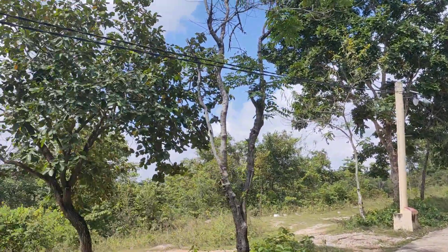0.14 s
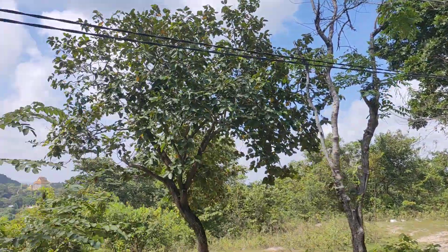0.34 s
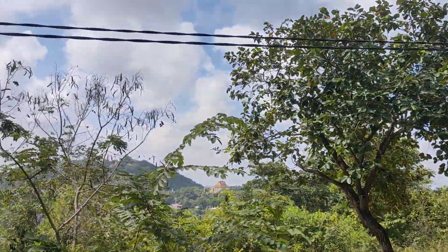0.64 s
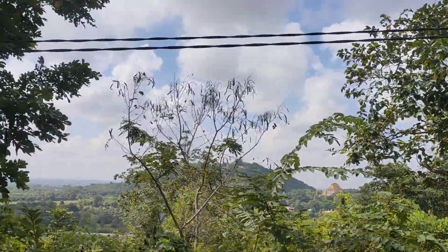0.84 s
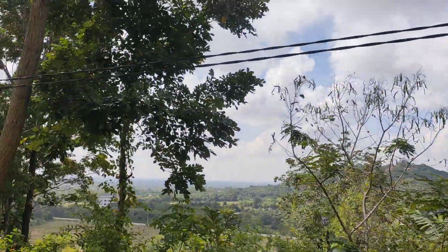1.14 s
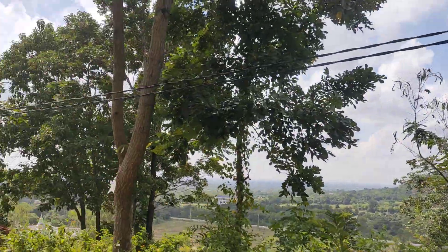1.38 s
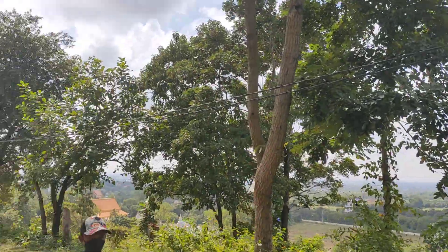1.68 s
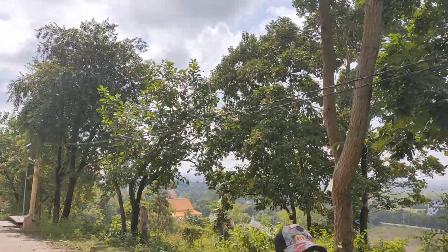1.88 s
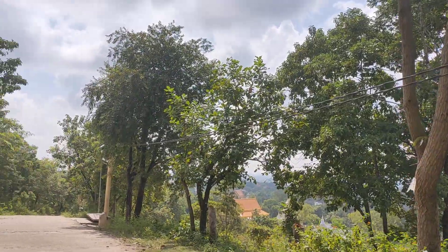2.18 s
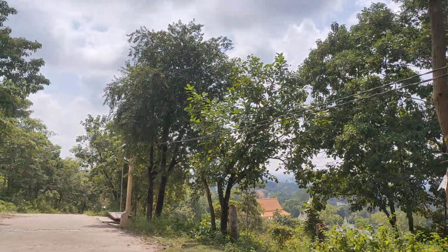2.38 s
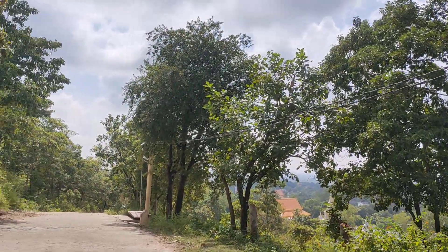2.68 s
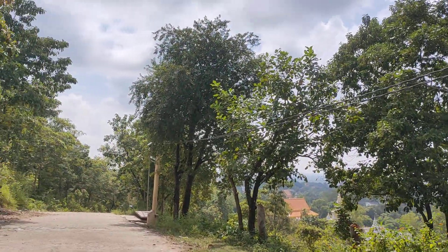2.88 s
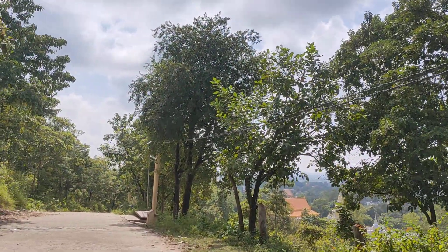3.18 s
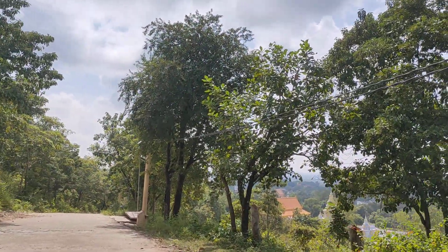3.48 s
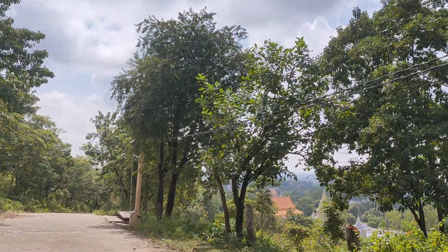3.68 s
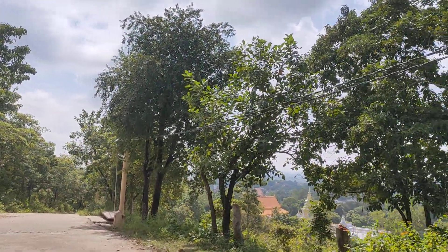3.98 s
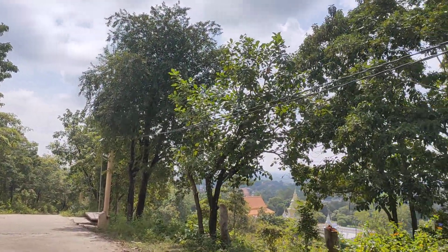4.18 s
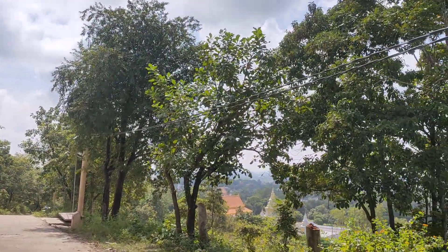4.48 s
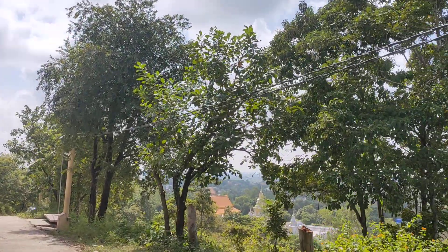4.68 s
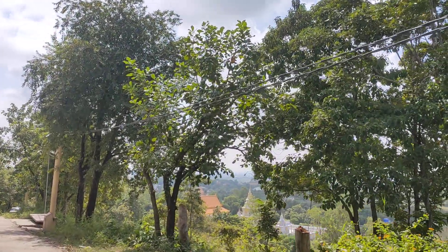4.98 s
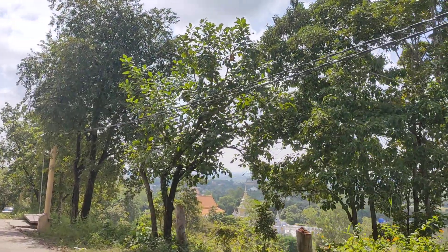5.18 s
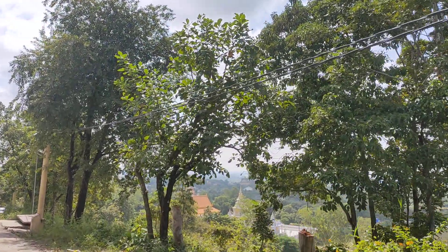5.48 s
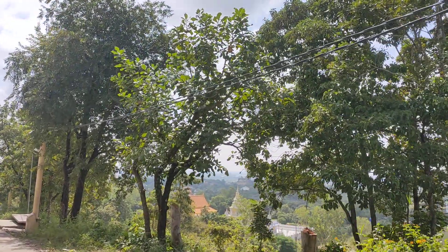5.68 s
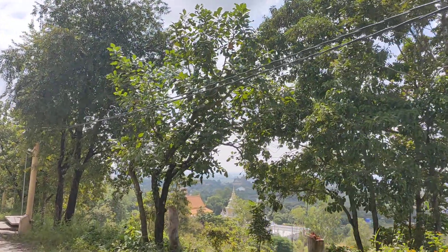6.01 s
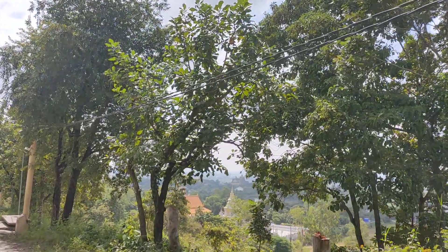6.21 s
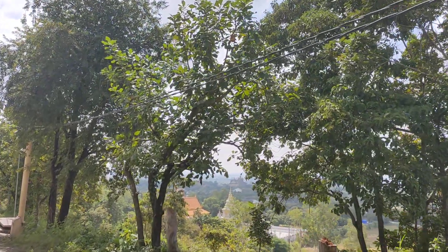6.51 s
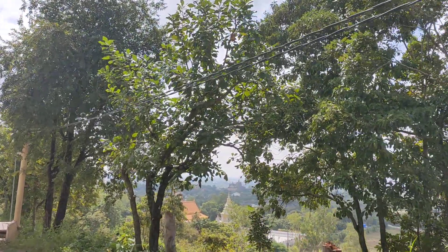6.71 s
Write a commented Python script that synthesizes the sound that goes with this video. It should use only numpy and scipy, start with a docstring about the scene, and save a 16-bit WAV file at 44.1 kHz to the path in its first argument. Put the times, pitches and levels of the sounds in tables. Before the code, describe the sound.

A single-cylinder motorbike putters at idle up a wooded hill road, over a faint low rumble of outdoor air. At about 0.3 seconds something hollow clacks once, with a few ticks of grit around it. Soft low thumps, mostly a strong one followed by a weaker one, recur from the start until about 5 seconds. The bike grows louder and passes very close to the hand-held phone between 2 and 2.5 seconds, with a swell of tyre roar, a bright sizzle sinking in pitch, and a cracking, raspy exhaust. Just after 3 seconds the throttle opens a little and the putter turns slightly faster and tighter, with a chain rasp, more grit and one thin, brief squeak. Valves tick faintly around 4 seconds. Engine and tyre noise fade gradually as the bike leaves, the throttle easing after about 6.3 seconds.

```python
"""The putter of an idling single-cylinder motorbike comes up a wooded hill road, over faint outdoor air.
Grit ticks, soft thumps come mostly in strong-weak pairs, and something hollow clacks once.
Each firing rings the silencer while clatter rings the casing; tyres roar and the running gear hisses.
The bike rolls close past a hand-held phone with a sizzle, a crack and a rasp, then opens the throttle
a little. There is one thin squeak, and the valves tick as it leaves."""
import sys
import numpy as np
from scipy import signal
from scipy.fft import rfft, irfft
from scipy.io import wavfile
from scipy.ndimage import map_coordinates

SR = 44100
rng = np.random.default_rng(int(sys.argv[2]) if len(sys.argv) > 2 else 0)


def generate_wav(sig):
    """Save sig (samples, or channels by samples) to the path in sys.argv[1] as 16-bit PCM at SR."""
    pcm = np.round(np.clip(np.atleast_2d(sig).T, -1, 1) * 32767).astype(np.int16)
    wavfile.write(sys.argv[1], SR, pcm)


N = 302085
TIME = np.arange(N) / SR
FREQ = np.maximum(np.fft.rfftfreq(N, 1 / SR), 1)
PASS_S, SPEED_M_S, CLOSEST_M = 2.261, 4.43, 1.082
THROTTLE_OPENS_S, THROTTLE_CLOSES_S, THROTTLE_MOVE_S = 3.05, 6.32, 0.32

# Table levels are relative: each layer sets its own gain.
# firing rate, sagging at idle until the throttle opens: t/s, f/Hz
FIRING_RATE = [(0, 22.68), (.6, 22.47), (1.2, 22.44), (1.28, 21.77), (1.9, 21.29), (2.4, 20.81),
               (2.9, 20.24), (3.33, 20.66), (3.57, 23.73), (3.85, 23.71), (4.18, 23.92), (4.7, 23.7),
               (5.3, 23.45), (5.88, 24.8), (6.3, 23.6)]
# silencer chamber resonances: f/Hz, width/Hz, level/dB, polarity
SILENCER_MODES = [(125.5, 101.6, 2, 1), (59, 33, -1.5, 1), (80.4, 245, -7.5, -1)]
# how much of each pulse's edge reaches the phone as the pipe turns past: t/s, level/dB
PULSE_EDGE = [(1.3, 10.5), (2.15, 8.5), (2.55, -21), (3.7, 6), (4.8, 7.5), (6.85, 3.5)]
# bearing of the bike from the turning phone, as the left microphone port's lag: t/s, lag/ms
BEARING_LAG = [(1.2, -0.43), (1.9, 0.064), (2.4, 0.48), (3.0, 0.165), (4.7, 0.18)]
# tyre roar spectrum: f/Hz, level/dB
ROAR_EQ = [(30, -16), (90, 9), (200, 0), (380, -1.5), (620, -4), (1100, -8.5), (1600, -11.5), (2200, -17),
           (2800, -17), (4500, -20.5), (7000, -101)]
# running-gear hiss spectrum at the left port: f/Hz, level/dB
HISS_LEFT_EQ = [(2000, -5.5), (4500, -6.5), (6000, -1), (7300, -2), (8500, 5.5), (9800, 0.5), (11500, -6),
                (15000, -14)]
# the same hiss at the right port: f/Hz, level/dB
HISS_RIGHT_EQ = [(2000, -2.5), (4500, -6.5), (5700, -0.5), (7600, 1), (8500, 3), (9800, -4.5),
                 (11500, -16.5), (15000, -15)]
# thin spray on top of the hiss: f/Hz, level/dB
SPRAY_EQ = [(8000, -31), (10500, -9.5), (12500, -5), (14500, -2), (16000, 1)]
# outdoor air spectrum: f/Hz, level/dB
AIR_EQ = [(20, -41), (32, -24), (41, -7), (55, 9.5), (100, -12.5), (170, 0), (235, -9), (300, -18.5),
          (450, -33), (600, -14.5), (1000, -21.5), (1400, -77), (8000, -62)]
# low buffets of air on the phone: t/s, level/dB, half length/s
AIR_BUFFETS = [(0.02, -40.5, 0.045), (2.126, -45, 0.21), (3.166, -38, 0.067), (5.143, -41, 0.11),
               (6.147, -40, 0.069), (6.814, -40, 0.076)]
# engine casing and silencer shell resonances: f/Hz, width before broadening/Hz, level/dB
CASING_MODES = [(282.7, 20, 5), (822, 55, 6.5), (1041, 57, 3.5), (1263, 134, -4), (2590, 310, -9),
                (3440, 160, -11), (5720, 140, -17), (6940, 270, -14)]
# fader ride on the casing's buzz: t/s, level/dB
CASING_LEVEL = [(.7, -60.5), (1.3, -51), (2.0, -48), (3.0, -51), (6.85, -52.5)]
# grit ticking on the road: t/s, level/dB, f/Hz, width/Hz, decay/s, rise/s
GRIT_TICKS = [(0.128, -50, 1800, 2410, 0.05, .003), (.186, -37.5, 556, 595, 0.029, 0.003),
              (0.21, -41, 2980, 1200, 0.016, .005), (0.668, -44, 8400, 6300, 0.0086, .004),
              (3.159, -38, 5300, 3000, 0.014, .002), (3.174, -39, 2380, 1600, 0.0054, .001),
              (3.196, -32, 1430, 1100, 0.0038, 0.00022), (5.757, -42.5, 1750, 1500, 0.02, 0.0057),
              (6.35, -48, 2250, 1600, .014, 0.0053)]
# soft thumps, mostly a strong one then a weaker one: t/s, level/dB
THUMP_HITS = [(0.141, -31), (0.3, -33), (0.487, -30.5), (0.645, -37), (0.836, -30), (0.985, -37),
              (1.175, -30), (1.349, -39.5), (1.548, -32), (1.691, -35.5), (2.05, -27.5), (2.389, -31),
              (2.751, -32), (2.894, -40), (3.209, -29), (3.359, -36), (3.552, -31.5), (3.707, -37),
              (3.885, -32), (4.223, -32.5), (4.38, -42), (4.56, -32.5), (4.884, -39.5), (5.063, -33.5)]
# the clack and its rebounds: t/s, crack level/dB, decay/s, push on the modes/dB
CLACK_BLOWS = [(0.282, -20.5, 0.018, -8), (0.295, -36, 0.007, -2.5), (0.309, -30, 0.01, -11),
               (0.326, -28, 0.014, -13), (0.345, -33, 0.028, -20)]
# spectrum of each blow's crack: f/Hz, level/dB
CLACK_EQ = [(88, -12), (150, -6), (371, -1.5), (495, -4.5), (714, -7), (818, -7), (1030, -10.5),
            (1670, -11), (1770, -17), (2020, -12.5), (2900, -16.5), (4000, -20.5), (5510, -24.5),
            (7350, -18.5), (11200, -33.5), (15000, -35)]
# hollow ring of the clack: f/Hz, level/dB, decay/s
CLACK_MODES = [(255, -32, .028), (345, -32, .014), (425, -32, .013), (501, -20, .021), (575, -27, .014),
               (659, -27, .022), (810, -32, .016), (1670, -42, .018), (2065, -40, .018), (2595, -43, .014),
               (2900, -39, .008)]
# one thin squeak: t/s, level/dB, f/Hz, width/Hz, half length/s
SQUEAK = [(3.208, -43, 2980, 480, 0.018)]


def undb(db):
    """Decibels to gain."""
    return 10 ** (np.asarray(db) / 20)


def unit(x):
    """Scale to rms 1."""
    return x / np.sqrt(np.mean(x ** 2))


def curve(table):
    """An automation line through (t/s, value) points."""
    return np.interp(TIME, *np.transpose(table))


def colour(x, spectrum):
    """EQ a sound through (f/Hz, level/dB) points."""
    hz, db = np.transpose(spectrum)
    return irfft(rfft(x) * undb(np.interp(np.log(FREQ), np.log(hz), db)), N)


def ring(x, hz, width_hz):
    """One resonance, gain 1 at its centre."""
    return signal.lfilter(*signal.iirpeak(hz, hz / width_hz, SR), x)


def band(x, hz, width_hz):
    """The same resonance twice over, for steeper skirts."""
    return ring(ring(x, hz, width_hz), hz, width_hz)


def gliding_noise(centre_hz, width_hz):
    """A stereo band of noise that follows a moving pitch."""
    lowpass = signal.butter(2, width_hz / 2, fs=SR, output="sos")
    noise = signal.sosfilt(lowpass, rng.standard_normal((2, N)))
    return noise * np.cos(2 * np.pi * np.cumsum(centre_hz) / SR)


def drift(per_s):
    """Random wander with a spread near 1; it holds still after 400 points."""
    points = rng.standard_normal(400)
    return np.sqrt(3 / 2) * np.interp(TIME * per_s, np.arange(len(points)), points)


def burst(start_s, decay_s, rise_s=0.0032, time=TIME):
    """Envelope of a quick attack and an exponential decay."""
    age = np.maximum(time - start_s, 0)
    return (1 - np.exp(-age / rise_s)) * np.exp(-age / decay_s)


def swell(at_s, half_length_s):
    """A smooth rise and fall around one moment."""
    return np.exp(-((TIME - at_s) / half_length_s) ** 2)


def throb(cycles, depth, late):
    """Tremolo locked to the engine, peaking `late` cycles after each firing."""
    return 1 + depth * np.cos(2 * np.pi * (cycles - late))


def flicker(x, depth_db=3.0, per_s=11, patch_hz=330):
    """Patches of the spectrum swell and fade on their own, so the colour never sits still."""
    hz, s, bins = signal.stft(x, SR, nperseg=1024)
    place = np.meshgrid(hz / patch_hz, s * per_s, indexing="ij")
    db = depth_db * map_coordinates(rng.standard_normal((100, 100)), place, order=1, mode="wrap")
    return signal.istft(bins * undb(db), SR)[1][:, :N]


def pan(db):
    """Stereo gains for a left-minus-right level difference."""
    return undb(np.array([[1], [-1]]) * db / 2)


def ports(x, lag_ms):
    """A sound reaches the two microphone ports at slightly different times."""
    shift_s = lag_ms / 1000 / 2
    return np.array([np.interp(TIME - shift_s, TIME, x), np.interp(TIME + shift_s, TIME, x)])


def shadow(db_per_ms=11, offset_db=-1):
    """Left minus right dB in the treble: the phone shades the port that the sound reaches last."""
    return offset_db - db_per_ms * curve(BEARING_LAG)


def diffuse(null_hz=1050):
    """Noise from all round: alike at both ports in the bass, unrelated in the treble."""
    alike = np.sinc(FREQ / null_hz)
    mid, side = rfft(rng.standard_normal((2, N)))
    mid, side = mid * np.sqrt(1 + alike), side * np.sqrt(1 - alike)
    return unit(irfft(np.array([mid + side, mid - side]), N))


def placed_noise(scatter_db, lag_ms=curve(BEARING_LAG)):
    """Noise from one bearing, the bike's by default, plus its scatter from ground and trees."""
    return unit(ports(rng.standard_normal(N), lag_ms) + undb(scatter_db) * diffuse())


def throttle():
    """0 at idle, 1 while the throttle is held open."""
    opened = np.clip((TIME - THROTTLE_OPENS_S) / THROTTLE_MOVE_S, 0, 1)
    closed = np.clip((TIME - THROTTLE_CLOSES_S) / THROTTLE_MOVE_S, 0, 1)
    return opened - closed


def passing(gain_db, behind_m, falloff, throttle_db=0, rear_db=0):
    """Pass-by gain of a part set behind the bike's middle, from distance, throttle and rearward bias."""
    along = SPEED_M_S * (TIME - PASS_S) - behind_m
    distance = np.hypot(along, CLOSEST_M)
    db = gain_db + throttle_db * throttle() + rear_db * along / distance
    return undb(db) * (CLOSEST_M / distance) ** falloff


def exhaust(cycles, uneven_db=0.37, soft_hz=160, drive_db=33, edge_hz=190, punch_share=0.55):
    """One pressure pulse a firing, rounded by the pipe, rings the silencer; once the tailpipe points back at
    the phone the pulses come through tighter, fading in along the throttle's ramp."""
    at = np.flatnonzero(np.diff(np.floor(cycles)))
    firings = np.zeros(N)
    firings[at] = undb(uneven_db * rng.standard_normal(len(at)))
    pulses = undb(drive_db) * signal.lfilter(*signal.butter(2, soft_hz, fs=SR), firings)
    chambers = sum(sign * undb(db) * band(pulses, hz, width) for hz, width, db, sign in SILENCER_MODES)
    share = punch_share * throttle()
    beat = (1 - share) * chambers + share * punch(firings)
    # the bass spreads all round, the edge of each pulse depends on the bearing
    edge = signal.sosfiltfilt(signal.butter(3, edge_hz, "high", fs=SR, output="sos"), beat)
    beat += edge * (undb(curve(PULSE_EDGE)) - 1)
    ride = passing(-0.27, behind_m=0.76, falloff=0.97, throttle_db=3.0, rear_db=0.9)
    return (beat - tailpipe(pulses)) * ride


def tailpipe(pulses, idle_hz=258, hot_hz=286.5, width_hz=14, hot_db=3.0, gain_db=-10.5):
    """The pulses ring the tailpipe, higher on the throttle as the gas runs hotter."""
    idle = (1 - throttle()) * ring(pulses, idle_hz, width_hz)
    hot = throttle() * ring(pulses, hot_hz, width_hz) * undb(hot_db)
    return (idle + hot) * undb(gain_db)


def tyres(tilt_db_per_octave=2.0, pivot_hz=800, flutter_db=1.0):
    """Tyres roar on concrete, brighter close by; the trees scatter the roar back, so it fades slowly."""
    roar = unit(colour(placed_noise(scatter_db=-2.5), ROAR_EQ))
    bright = irfft(rfft(roar) * undb(tilt_db_per_octave * np.log2(FREQ / pivot_hz)), N)
    near = bright * passing(-36, behind_m=0.086, falloff=1.49)
    scattered = unit(colour(placed_noise(scatter_db=-5.0), ROAR_EQ))
    scattered *= passing(-41.5, behind_m=-0.13, falloff=0.3, rear_db=-1.0)
    return (near + scattered) * undb(flutter_db * drift(per_s=30)) * pan(-0.12)


def running_gear(cycles, grain_db=0.5, grain_samples=64, flutter_db=1.1):
    """Chain and wheels give a fine-grained hiss, with a thin spray on top that carries less far."""
    grains = undb(grain_db * rng.standard_normal(N // grain_samples + 1))
    grain = np.repeat(grains, grain_samples)[:N]
    flutter = undb(flutter_db * drift(per_s=35)) * throb(cycles, depth=0.098, late=0.15)
    left, right = placed_noise(scatter_db=-0.5) * grain
    hiss = np.array([unit(colour(left, HISS_LEFT_EQ)), unit(colour(right, HISS_RIGHT_EQ))])
    hiss *= pan(shadow()) * passing(-38, behind_m=0.018, falloff=0.77, throttle_db=3.0)
    spray = unit(colour(diffuse() * grain, SPRAY_EQ)) * pan(shadow() - 9)
    spray *= passing(-42, behind_m=0.14, falloff=1.0, throttle_db=3.0, rear_db=0.5)
    return (hiss + spray) * flutter


def outdoors():
    """A wavering bed of low air rumble, with separate buffets and eddies at each port."""
    air = unit(colour(diffuse(), AIR_EQ)) * undb(-50 + drift(per_s=2.1))
    gusts = sum(undb(db) * swell(s, length) for s, db, length in AIR_BUFFETS)
    buffets = unit(band(rng.standard_normal((2, N)), hz=65, width_hz=55)) * gusts
    eddies = unit(band(rng.standard_normal((2, N)), hz=33, width_hz=69))
    eddies *= undb(-56 + 0.44 * drift(per_s=5.4))
    return air + (buffets + eddies) * pan(-11)


def casing(cycles, broaden=2.14):
    """Mechanical clatter, strongest after each firing, rings the engine's metal."""
    clatter = placed_noise(scatter_db=1.5) * throb(cycles, depth=0.059, late=0.2)
    metal = sum(undb(db) * band(clatter, hz, broaden * width) for hz, width, db in CASING_MODES)
    return unit(metal) * undb(curve(CASING_LEVEL)) * pan(-2.8)


def grit(rattle_db=5.5, rattle_per_s=260):
    """Small stones tick and rattle on the road."""
    out = np.zeros((2, N))
    for s, db, hz, width, decay, rise in GRIT_TICKS:
        span = (TIME >= s) & (TIME < s + .3)
        noise = unit(band(rng.standard_normal((2, SR // 3)), hz, width))[:, :span.sum()]
        rattle = undb(rattle_db * drift(rattle_per_s)[:span.sum()])
        out[:, span] += noise * rattle * undb(db) * burst(s, decay, rise, TIME[span])
    return out * pan(-2)


def thumps(hz=106, detune=0.055, half_length_s=0.0064, gain_db=10.5):
    """Soft pushes with no crack: each a low swing that dies within a cycle or two."""
    out = np.zeros(N)
    for s, db in THUMP_HITS:
        pitch = hz * (1 + detune * rng.standard_normal())
        swing = np.cos(2 * np.pi * pitch * (TIME - s))
        out += undb(db + gain_db) * swing * swell(s, half_length_s)
    return out


def clack(ring_db=-0.7, tail_db=-32, snap_db=-28):
    """A hollow knock snaps and rebounds; each blow cracks and rings the same modes, over a dull tail."""
    start = CLACK_BLOWS[0][0]
    tail = unit(band(diffuse(), hz=470, width_hz=620)) * undb(tail_db) * burst(start, decay_s=0.063)
    blows = sum(undb(db) * burst(s, decay) for s, db, decay, _ in CLACK_BLOWS)
    crack = unit(colour(placed_noise(scatter_db=1.5, lag_ms=-0.394), CLACK_EQ)) * blows
    body = np.zeros(N)
    span = np.abs(TIME - start) < .3
    for hz, db, decay in CLACK_MODES:
        swing = sum(undb(push_db) * burst(s, decay, time=TIME[span]) for s, _, _, push_db in CLACK_BLOWS)
        body[span] += undb(db + ring_db) * swing * np.sin(2 * np.pi * (hz * TIME[span] + rng.random()))
    snap = ring(ring(diffuse(), hz=2800, width_hz=4300), hz=2800, width_hz=4500)
    snap *= undb(snap_db) * burst(start, decay_s=0.0078)
    return (crack + tail + ports(body, lag_ms=-0.41)) * pan(-3.3) + snap * pan(-8)


def tyre_horn(at_s=1.99, lead_s=0.12, grain_db=3.5):
    """The wedge between tyre and road throws a gritty midrange roar ahead of the bike, top band first."""
    noise = placed_noise(scatter_db=-11) * undb(grain_db * drift(per_s=55))
    lower = unit(band(noise, hz=1150, width_hz=480)) * undb(-44) * swell(at_s, 0.3)
    upper = unit(band(noise, hz=1950, width_hz=900)) * undb(-50) * swell(at_s - lead_s, 0.17)
    return lower + upper


def bark(cycles, crack_width_s=0.00072, decay_cycles=0.8):
    """Close by, each firing opens with a sharp crack, and a rasp of gas fades towards the next."""
    from_firing_s = ((cycles + .5) % 1 - .5) / curve(FIRING_RATE)
    widths = from_firing_s / crack_width_s - 3.5
    crack = (widths ** 2 - 1) * np.exp(-widths ** 2 / 2) * passing(-24, behind_m=-0.3, falloff=5.1)
    gas = placed_noise(scatter_db=-3) * np.exp(-(cycles % 1) / decay_cycles)
    low = unit(band(gas, hz=480, width_hz=650)) * undb(-41)
    high = unit(band(gas, hz=2500, width_hz=1400)) * undb(-46)
    return crack + (low + high) * passing(0, behind_m=0.05, falloff=2.27)


def sizzle(cycles, hz=7200, glide_hz=1500, width_hz=1600):
    """A bright band of hiss sinks in pitch as the bike goes by, and flares as each wheel draws level."""
    along = SPEED_M_S * (TIME - PASS_S) - 0.7
    centre_hz = hz - glide_hz * along / np.hypot(along, 0.95)
    hiss = unit(gliding_noise(centre_hz, width_hz)) * throb(cycles, depth=0.28, late=0.25)
    front = passing(-41, behind_m=-1.13, falloff=10.0)
    rear = passing(-40, behind_m=0.62, falloff=6.1)
    return hiss * (front + rear) * pan(shadow(db_per_ms=41, offset_db=7.5))


def chain_rasp(cycles):
    """A narrow rasp from the chain throbs with the engine and comes up on the throttle."""
    rasp = unit(band(diffuse(), hz=3750, width_hz=900)) * throb(cycles, depth=0.18, late=0.15)
    return rasp * passing(-53.5, behind_m=2.36, falloff=0.89, throttle_db=9.5, rear_db=-4.5) * pan(-8)


def punch(firings, width_s=0.0023, delay_s=0.00542, gain_db=-14):
    """A pulse punches straight through the silencer: one sharp pressure dip, with no ring after it."""
    widths = (np.arange(-SR // 50, SR // 50) / SR - delay_s) / width_s
    dip = (widths ** 2 - 1) * np.exp(-widths ** 2 / 2)
    return signal.fftconvolve(firings, dip, mode="same") * undb(gain_db)


def squeak():
    """A brief whistle of narrow noise swells and fades around one pitch."""
    out = np.zeros((2, N))
    for s, db, hz, width, length in SQUEAK:
        span = np.abs(TIME - s) < .1
        noise = unit(band(rng.standard_normal((2, SR // 2)), hz, width))[:, -span.sum():]
        out[:, span] += noise * undb(db) * swell(s, length)[span]
    return out * pan(-3)


def valves(cycles, hz=5680, spread_hz=170, width_hz=650, late_cycles=0.14, half_length_cycles=0.23):
    """A valve chirps once an engine cycle, each time at its own pitch, emerging as the bike pulls away."""
    nearest_firing = np.floor(cycles + .5).astype(int)
    pitch = hz + spread_hz * rng.standard_normal(400)[2 * nearest_firing]
    tick = np.exp(-((cycles - nearest_firing - late_cycles) / half_length_cycles) ** 2)
    chirps = unit(gliding_noise(pitch, width_hz) * tick)
    return chirps * undb(-52.5) * swell(at_s=4.07, half_length_s=0.54) * pan(-4)


def scene():
    """Mix the bike, the knocks and the open air; one count of engine cycles keeps the bike in step."""
    cycles = np.cumsum(curve(FIRING_RATE)) / SR - .095
    engine = exhaust(cycles) + bark(cycles) + flicker(casing(cycles)) + valves(cycles)
    wheels = tyres() + tyre_horn() + flicker(running_gear(cycles) + chain_rasp(cycles) + sizzle(cycles))
    return engine + wheels + thumps() + clack() + grit() + squeak() + outdoors()


def record(dry, low_cut_hz=27, high_cut_hz=15700):
    """The phone cuts the deepest bass and the very top."""
    dry = signal.sosfiltfilt(signal.butter(4, low_cut_hz, "high", fs=SR, output="sos"), dry)
    return signal.sosfilt(signal.ellip(10, .2, 80, high_cut_hz, fs=SR, output="sos"), dry)


dry = scene()
out = record(dry)
generate_wav(out)
```